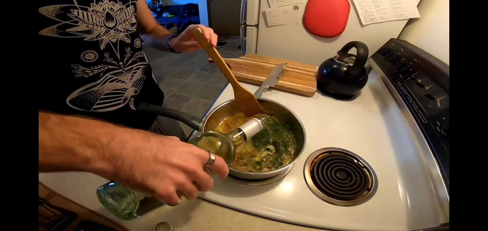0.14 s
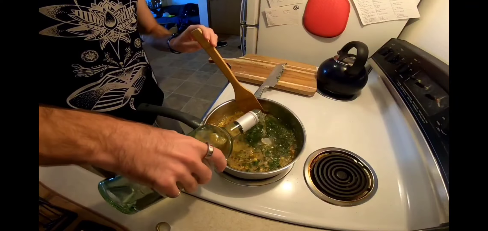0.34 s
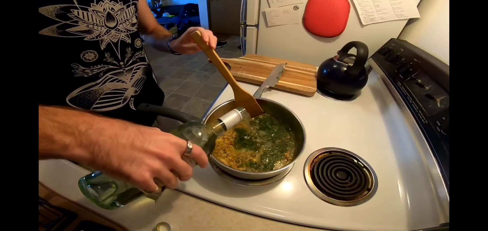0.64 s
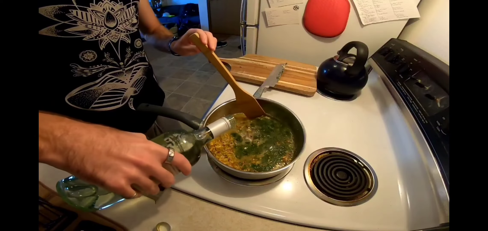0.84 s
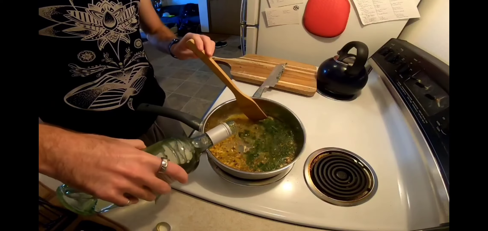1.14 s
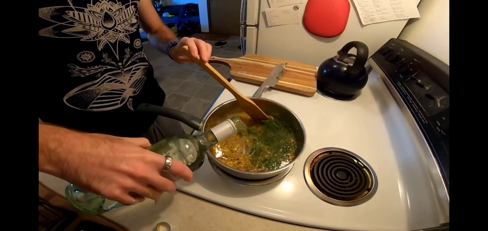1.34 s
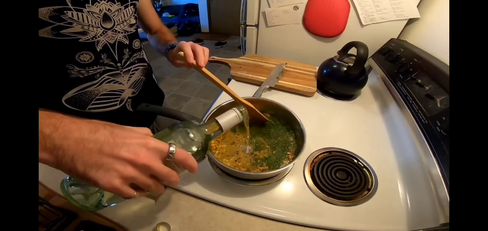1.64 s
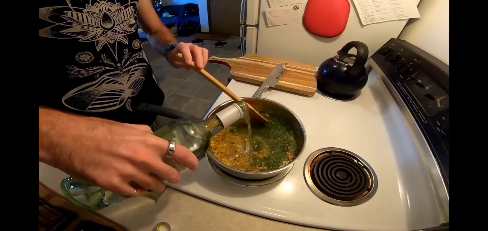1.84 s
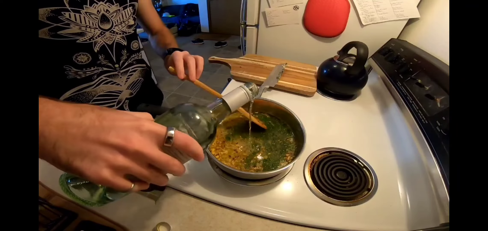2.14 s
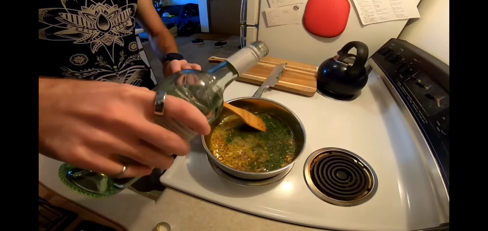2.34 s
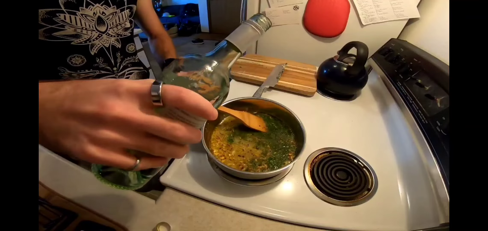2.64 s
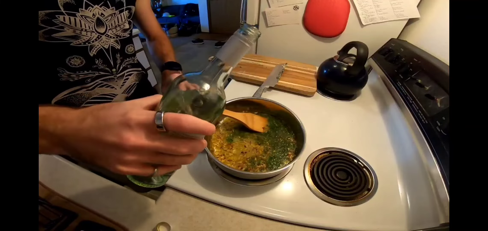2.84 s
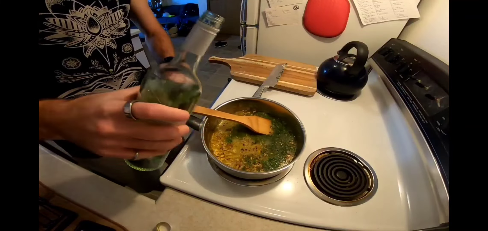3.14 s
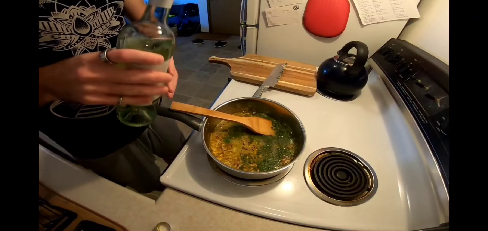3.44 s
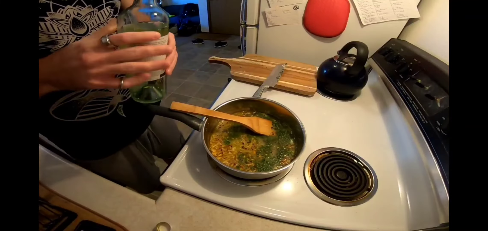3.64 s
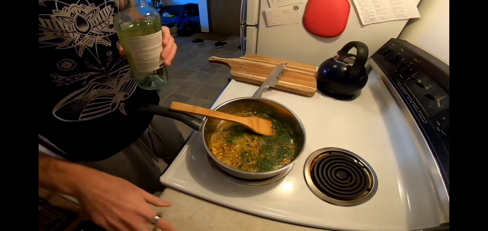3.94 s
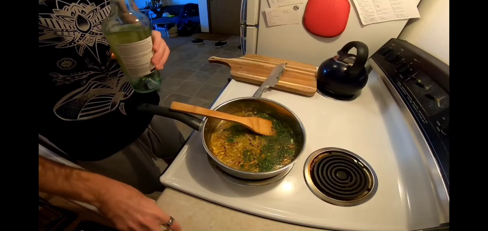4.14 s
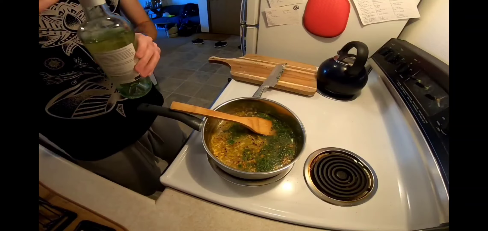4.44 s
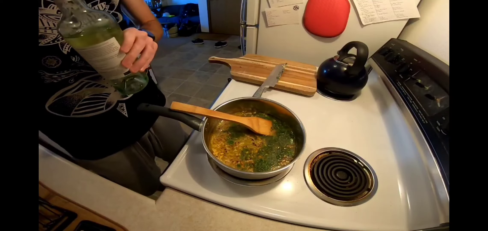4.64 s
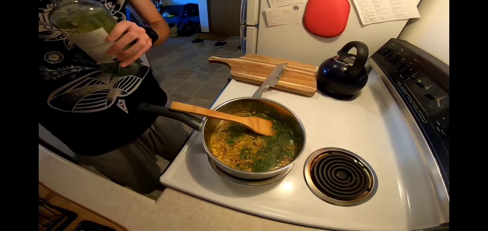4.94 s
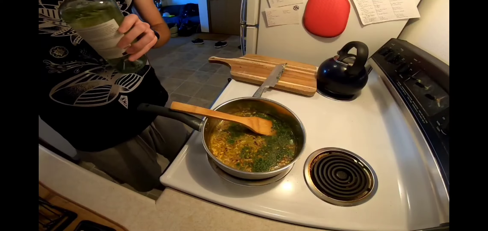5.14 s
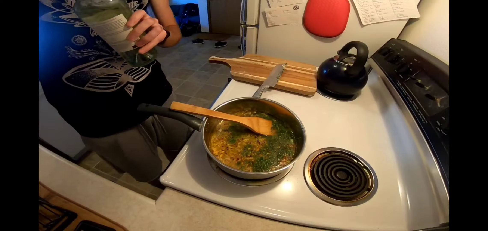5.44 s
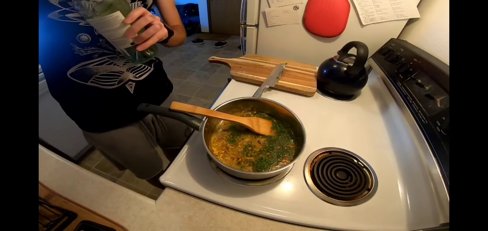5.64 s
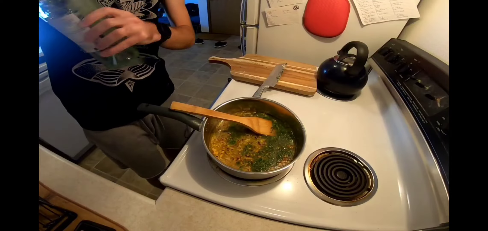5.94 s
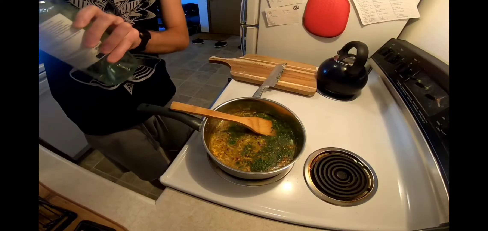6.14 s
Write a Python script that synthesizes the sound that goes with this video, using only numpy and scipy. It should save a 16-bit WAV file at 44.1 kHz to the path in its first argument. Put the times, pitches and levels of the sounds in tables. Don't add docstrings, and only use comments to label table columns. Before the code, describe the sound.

A close stereo pickup in a small kitchen with faint room air and a short echo. From 0 to 2.6 s wine pours into a wet stew: frothy gurgling, clear plops around 0.1-0.4, 0.75 and 1.03 s, crisp splats, and low bottle glugs, strongest near 0.7 and 1.0 s. The stream thins around 1.3 s, surges again near 2.2-2.3 s, then dribbles out. At 2.8 s a wooden spoon knocks the steel rim with a short hollow ring and tiny bounces, the pan rocking faintly. A sleeve rustles near 3 s; very quiet squeaks and rubs on glass follow at 3.6-3.8. A hand lands with a soft thump at 4.2 s. At 4.67 s a thin metal cap strikes the neck, the loudest, sharpest sound, then gritty scrapes, short singing strokes and damped clicks continue to about 5.8 s. Faint chinks close at 6.1-6.3 s.

```python
import sys
import numpy as np
from scipy import signal
from scipy.fft import rfft, irfft, next_fast_len
from scipy.io import wavfile
from scipy.ndimage import uniform_filter1d

SR = 44100
rng = np.random.default_rng(int(sys.argv[2]) if len(sys.argv) > 2 else 0)


def voltage_ratio(decibels):
    exponent = np.asarray(decibels, float) / 20
    return 10 ** exponent


def store_wav(level_fs):
    pcm = np.round(np.clip(np.atleast_2d(level_fs), -1, 1) * 32767)
    wavfile.write(sys.argv[1], SR, pcm.T.astype(np.int16))


N = 276948
POUR_END_S = 2.62

# (frequency [Hz], level [dB per Hz])
AIR_SPECTRUM = [(15, -38), (25, -11), (91, -18.5), (226, -2.5), (313, -13.5), (357, -8), (443, -13.5),
                (493, -7.5), (580, -13.5), (738, -11), (2280, -23.5), (8750, -32), (15400, -64.5)]
AIR_DB = -73
# (frequency [Hz], correlation [0 to 1])
STEREO_LIKENESS = [(60, 0.74), (500, 0.2), (2000, 0.23), (5000, 0.9), (12000, 0.11)]
# (time [s], level [dB])
RUMBLE = [
    (0, -81.5),
    (3.3, -86.5),
    (3.5, -72.5),
    (3.7, -82),
    (6.3, -85.5),
]
# (time [s], level [dB])
SLEEVE = [
    (2.85, -90),
    (3.0, -76.5),
    (3.2, -84),
    (3.35, -95),
]
# (frequency [Hz], level [dB per Hz])
CLOTH_SPECTRUM = [(1470, -44.5), (2500, -22), (4050, -16), (6340, 0), (11000, -38.5), (14300, -64),
                  (22000, -120)]
# (frequency [Hz], t60 [s])
KITCHEN_T60 = [(200, 0.26), (2000, 0.2), (10000, 0.13)]

# (time [s], peak level [dB])
HAND_BLOWS = [
    (4.194, -43),
    (4.214, -33.5),
    (4.222, -37),
]
# (frequency [Hz], level [dB per Hz])
COUNTER_SPECTRUM = [(88, -38), (150, -9), (318, -34), (477, -11), (1270, 0), (1770, -15.5), (2310, -6),
                    (2810, -26), (5720, -10.5), (10000, -25), (15000, -54)]

# (time [s], peak level [dB])
SPOON_BLOWS = [
    (2.785, -42),
    (2.791, -41.5),
    (2.85, -56),
    (2.949, -59),
]
# (frequency [Hz], level [dB], t60 [s])
RIM_MODES = [(523, -5, 0.21), (704, -6, 0.053), (870, -9, 0.36), (1132, -4, 0.19), (1325, -3.5, 0.18),
             (1550, -11.5, 0.092)]
# (time [s], level [dB], length
# [s], fade [dB per s])
DULL_SHUDDERS = [
    (2.79, -54, 0.34, 42),
    (4.669, -64, 0.29, 6),
]

# (time [s], peak level [dB], left-right balance [dB])
CAP_LANDING = (4.670, -14.5, 0.66)
# (frequency [Hz], level [dB], t60 [s])
CAP_MODES = [(1688, -16.5, 0.049), (2810, -22, 0.089), (3030, -3.5, 0.041), (3563, -1.5, 0.019),
             (3970, -15.5, 0.067), (4640, -19.5, 0.072), (5600, -43, 0.18), (5360, -22, 0.065),
             (7400, -29.5, .06), (7760, -32, 0.087)]
# (frequency [Hz], width [Hz], level [dB])
HELD_CAP_MODES = [(2050, 100, -0.5), (2500, 89, -0.5), (3600, 210, -3.5), (4350, 82, -4), (5220, 92, -1),
                  (7320, 290, 0.5)]
# (time [s], peak level [dB], frequency [Hz], brightness [dB])
CAP_CLICKS = [(3.905, -50, 2970, -22), (4.8605, -24, 1330, -11), (4.8872, -26.5, 2520, -5),
              (5.1699, -34, 2290, -20.5), (5.1861, -24, 4340, -11), (5.3326, -22, 3640, -4.5),
              (5.3653, -24.5, 2610, -6), (5.714, -29.5, 2346, -8.5), (5.72, -25, 2190, -9.5),
              (5.725, -31.5, 1210, -25), (5.78, -24, 1790, -8), (6.1727, -48, 4530, 7.5)]
CLICK_CYCLES = 187
# (frequency [Hz], level [dB per Hz])
THREAD_SPECTRUM = [(410, -42.5), (700, -16.5), (1160, -5.5), (1470, -6), (2470, 1), (2780, -3.5),
                   (3590, -8), (4500, -10.5), (5850, -22), (9900, -120)]
# (frequency [Hz], level [dB per Hz])
RASP_SPECTRUM = [(2000, -20.5), (3500, -6), (5400, -2), (7450, -5), (10200, -10), (11300, -24),
                 (13500, -19.5), (15000, -46), (16000, -88.5)]
# (peak time [s], level [dB], rise
# [s], fall [s], brightness [dB])
CAP_SCRAPES = [(3.637, -77.5, .02, .03, 9.5), (3.725, -72.5, 0.061, 0.057, 11),
               (3.772, -66, 0.045, 0.17, 0.5), (4.47, -71.5, 0.058, 0.16, 7),
               (4.68, -47, 0.027, 0.12, -13), (4.785, -42, 0.077, 0.026, -1), (4.895, -40, 0.1, 0.063, -9),
               (5.019, -39.5, 0.037, 0.061, 3), (5.079, -42.5, 0.048, 0.1, -8.5),
               (5.2, -59, 0.031, 0.02, 10), (5.336, -43, 0.0064, 0.19, -3), (5.455, -46, 0.066, .04, -13),
               (5.495, -38.5, 0.051, 0.033, -9), (5.745, -42.5, 0.042, 0.074, -1.5),
               (6.18, -65.5, 0.14, 0.17, 12)]
TURN_FADE_DB = 27
# (time [s], pressure level [dB])
FINGER_HOLD = [
    (4.66, -67),
    (5.32, -66.5),
    (5.6, -59),
    (5.85, -58.5),
    (6.05, -70.5),
    (6.28, -66.5),
]
# (centre time [s], rms level [dB], frequency [Hz], half length [s])
CAP_STROKES = [
    (4.726, -50, 3100, 0.037),
    (4.771, -47, 2500, 0.022),
    (4.776, -45, 1543, 0.012),
    (4.876, -44, 1277, 0.016),
    (4.745, -50, 1620, .03),
    (4.83, -58, 1450, .025),
    (4.9, -48, 3800, .006),
    (5.19, -50, 5250, .015),
    (5.024, -41.5, 2500, 0.015),
    (5.081, -50, 2520, 0.014),
]
STROKE_WIDTH_HZ = 280
# (centre time [s], rms level [dB], frequency [Hz], half length [s])
CAP_SQUEAKS = [
    (3.637, -75, 5050, 0.011),
    (3.637, -80, 6800, .01),
    (3.725, -80, 3510, .018),
    (3.725, -75, 4260, .018),
    (3.725, -74, 6450, .02),
    (3.72, -80, 9900, 0.014),
    (3.771, -70, 4250, .012),
    (3.772, -76, 3480, 0.011),
    (3.77, -77, 5300, .01),
    (3.772, -82, 7400, .01),
]
SQUEAK_WIDTH_HZ = 120
# (time [s], peak level [dB], frequency [Hz])
RING_CHINKS = [
    (6.131, -52.5, 4350),
    (6.209, -43, 4390),
    (6.264, -54, 3537),
]
# (time [s], peak level [dB], centre frequency [Hz])
GRIP_SHIFTS = [
    (4.862, -47.5, 270),
    (4.886, -49, 257),
    (5.182, -54, 460),
    (5.255, -48.5, 619),
    (5.288, -49.5, 358),
    (5.363, -46, 870),
    (5.519, -53, 586),
    (5.6, -56, 446),
    (5.717, -43.5, 751),
    (5.783, -58, 670),
]

# (centre time [s], peak level [dB], frequency [Hz])
AIR_GLUGS = [
    (.12, -43.5, 86.2),
    (.335, -60.5, 48.6),
    (.387, -56, 74.3),
    (.726, -37.5, 99.2),
    (.99, -42, 94),
    (1.039, -57, 88.5),
    (1.237, -50, 93),
    (1.531, -48, 81.1),
    (1.848, -49.5, 93),
]
GLUG_HALF_S, GLUG_SHORTENS, GLUG_RISE = .017, .35, .3
# (time [s], level [dB])
STREAM = [
    (0.0, -51.5),
    (0.98, -51.5),
    (1.3, -58.5),
    (1.98, -54),
    (2.16, -51),
    (2.32, -49),
    (2.38, -52),
    (2.5, -70.5),
    (2.62, -79),
]
# (frequency [Hz], level [dB per Hz])
GURGLE_SPECTRUM = [(380, -55), (650, -23), (884, -0.5), (1090, -10.5), (1320, -11), (1920, -4), (5000, -9),
                   (6500, -40), (11000, -120)]
# (frequency [Hz], level [dB per Hz])
SPRAY_SPECTRUM = [(1800, -35.5), (3000, 1), (4300, -10.5), (6200, -5.5), (7700, -4.5), (10300, -10.5),
                  (11300, -23.5), (14000, -35.5), (15400, -60)]
SPRAY_DB, SPRAY_GAINS_DB_PER_S = -11, 2.5
# (frequency [Hz], width [Hz], level [dB])
PAN_MODES = [(1920, 66, 7.5), (2440, 73, -6.5), (3820, 42, -2), (4690, 42, -7), (6330, 200, -4),
             (7420, 80, -3)]
# (time [s], peak level [dB], frequency [Hz], t60 [s], swell [s])
PLOPS = [(.01, -31.5, 3600, 0.021, .001), (.011, -29.5, 2960, 0.027, .001),
         (.1325, -26.5, 3600, .012, .0005), (.1325, -21, 1904, 0.017, .001), (.139, -27, 2136, 0.037, .003),
         (.19, -26, 3800, 0.026, .0006), (.396, -31.5, 1720, 0.015, .0005), (.399, -26.5, 2060, 0.01, .001),
         (.4015, -16.5, 2158, .017, .03), (.412, -26, 2170, .022, .02), (.425, -40, 2170, .4, .004),
         (.737, -19, 1730, 0.055, .001), (.737, -23, 2956, .04, .001), (.745, -23.5, 2196, .05, .002),
         (.765, -38, 1846, 0.14, .004), (1.024, -20.5, 1955, .012, .03), (1.032, -29.5, 1975, .03, .03),
         (1.05, -39, 2030, .04, .03), (2.183, -31, 2300, 0.029, .001)]
# (time [s], peak level [dB], frequency [Hz])
BUBBLES = [(0.081, -37, 1990), (0.522, -38, 3210), (.642, -36.5, 1900), (.634, -36.5, 3270),
           (.049, -42, 2810), (.1, -40, 2790), (.22, -43, 2300), (.259, -44, 4300), (.281, -43.5, 3900),
           (.312, -39, 3270), (.449, -43, 3310), (.565, -40.5, 3240), (.8, -38, 3400), (.909, -42.5, 2720),
           (.951, -39, 3000), (1.257, -44, 3190), (1.297, -45, 1700), (1.42, -43, 3460),
           (1.462, -42.5, 1940), (1.476, -40.5, 2850), (1.53, -47, 2690), (1.652, -39, 2900),
           (1.718, -40.5, 2800), (1.78, -41, 1800), (1.934, -40, 3820), (2.071, -38, 1930),
           (2.108, -39, 3390), (2.173, -31, 3380), (2.289, -41, 2640), (2.397, -39, 2900),
           (2.495, -44.5, 2650), (0.66, -37, 1550), (.807, -35, 2050), (.933, -33.5, 3060),
           (1.09, -37.5, 3100), (1.461, -41, 2820), (1.594, -34.5, 2036), (1.625, -35, 3600),
           (1.758, -39, 1790), (1.793, -38.5, 3260), (1.942, -32.5, 2020), (1.968, -34.5, 3660),
           (2.054, -37.5, 1900), (2.173, -34, 2440), (2.309, -34, 2175), (2.342, -34.5, 1770),
           (2.372, -36.5, 2010), (1.989, -39, 1870), (1.58, -37, 1880), (.735, -34, 3700),
           (2.372, -35.5, 3600), (2.437, -37.5, 2440), (2.516, -45.5, 2200)]
# (time [s], peak level [dB], frequency [Hz])
GULPS = [(.012, -42, 1200), (.058, -45.5, 1150), (.26, -47.5, 1250), (1.225, -45.5, 1200),
         (1.682, -50, 1600), (.951, -39, 1350), (1.055, -39, 1450), (0.14, -42.5, 1105), (.32, -40.5, 1040),
         (.36, -41.5, 704), (.535, -42.5, 1134), (0.711, -38.5, 1040), (0.751, -37.5, 577),
         (.845, -38.5, 1085), (.871, -38, 1370), (1.265, -38, 1300), (1.498, -41, 1384), (1.58, -39.5, 914),
         (1.911, -45, 1110), (2.223, -36.5, 866), (2.281, -35, 1320)]
BUBBLE_T60_S, GULP_T60_S = .045, .07
# (time [s], peak level [dB], centre frequency [Hz])
SPLATS = [(0.1677, -39, 7700), (0.323, -24, 5600), (.324, -30, 8000), (.393, -39.5, 3750),
          (.4868, -37.5, 9100), (0.601, -35, 6850), (0.635, -41, 5960), (.01, -35.5, 7100),
          (.079, -43.5, 7800), (.35, -42.5, 4500), (.378, -40, 4000), (.617, -42, 5000), (.922, -47, 6100),
          (.9966, -42, 4640), (1.115, -42, 7200), (1.331, -44, 5470), (1.43, -47.5, 5900),
          (1.9157, -41.5, 4960), (2.154, -41, 6330), (2.19, -36.5, 5500), (2.249, -37, 7600),
          (2.398, -40, 6500), (.743, -31, 4840), (.746, -37, 7000), (0.871, -36.5, 5300),
          (0.9556, -36, 4640), (1.0154, -42, 4470), (1.154, -36.5, 6730), (1.3606, -34.5, 5400),
          (1.463, -39, 4230), (1.543, -38.5, 4680), (1.5743, -30, 6200), (1.7558, -41, 6300),
          (1.8892, -42, 4850), (1.9883, -32.5, 3600), (2.0558, -39, 6600), (2.1325, -39, 6820),
          (2.175, -31, 5900), (2.2598, -32, 6700), (2.3079, -33.5, 3800), (2.341, -31.5, 6350),
          (2.371, -34.5, 6200), (2.458, -28, 8120), (2.515, -40.5, 4010)]

# (frequency [Hz], lead of the left [rad])
PORT_PHASE = [(90, 0.72), (200, 0.2), (600, 1.5), (1400, 1.28), (2600, 0.3), (5000, 0.98), (9000, 1.66),
              (14000, 1.8)]
# (frequency [Hz], level [dB])
TREBLE_BALANCE = [(9000, 3), (10700, 4), (11700, -6), (13000, -10.5), (14500, -6), (16000, -20.5)]
APART_S = .00004


def unit(x):
    return x / np.sqrt(np.mean(x ** 2) + 1e-20)


def along(points, hz):
    f, v = np.transpose(points)
    return np.interp(np.log(hz + 1), np.log(f + 1), v)


def gain(points):
    s, db = np.transpose(points)
    return voltage_ratio(np.interp(np.arange(N) / SR, s, db, left=-140, right=-140))


def seconds(length):
    return np.arange(round(length * SR)) / SR


def filtered(x, response):
    m = next_fast_len(x.shape[-1] + 2048)
    return irfft(rfft(x, m) * response(np.fft.rfftfreq(m, 1 / SR)), m)[..., :x.shape[-1]]


def peak(hz, width_hz):
    return lambda f: 1j * f * width_hz / (hz * hz - f * f + 1j * f * width_hz)


def steep(hz, width_hz):
    return lambda f: peak(hz, width_hz)(f) ** 2


def coloured(spectrum):
    return lambda hz: voltage_ratio(along(spectrum, hz))


def tinted(spectrum, modes):
    return lambda f: coloured(spectrum)(f) * np.abs(1 + sum(voltage_ratio(db) * peak(hz, w)(f) for hz, w, db in modes))


def rush(response, patchy_db):
    z = signal.stft(rng.standard_normal((2, N + 512)), nperseg=256)[2]
    field = uniform_filter1d(rng.standard_normal(z.shape[1:]), size=5, axis=0)
    field = uniform_filter1d(field, size=6, axis=1)
    pair = signal.istft(z * voltage_ratio(patchy_db * unit(field)), nperseg=256)[1][:, :N]

    def mid_side(hz):
        turn = np.arccos(np.clip(along(STEREO_LIKENESS, hz), -1, 1)) / 2
        return response(hz) * [np.cos(turn), np.sin(turn)]

    mid, side = filtered(pair, mid_side)
    return unit(np.array([mid + side, mid - side]))


def ring(t, hz, t60, rise, attack):
    phase = 2 * np.pi * hz * (t + rise * t * t / (2 * t60))
    return np.sin(phase) * voltage_ratio(-60 * t / t60) * (1 - np.exp(-t / attack))


def burst(t, t60, response):
    fade = voltage_ratio(-60 * t / t60)
    puff = filtered(rng.standard_normal(len(t)), response) * fade
    return .5 * puff * np.linalg.norm(fade) / np.linalg.norm(puff)


def add(out, s, sound, pan_db=0):
    lag = rng.normal(0, APART_S)
    for side, way in zip(out, (.5, -.5)):
        part = side[round((s + way * lag) * SR):][:len(sound)]
        part += sound[:len(part)] * voltage_ratio(way * pan_db)


def background():
    shake = filtered(rng.standard_normal((2, N)), steep(42, 40))
    air = voltage_ratio(AIR_DB + 1.0) * rush(lambda f: coloured(AIR_SPECTRUM)(f) * (f > 60), patchy_db=0.5)
    cloth = gain(SLEEVE) * rush(coloured(CLOTH_SPECTRUM), patchy_db=2)
    return air + gain(RUMBLE) * 1.4 * unit(shake) + cloth


def kitchen(x):
    out, step = np.zeros((2, N + SR)), SR // 4
    for start in range(0, N, step):
        hz, t, z = signal.stft(rng.standard_normal((2, SR // 3)), SR, nperseg=256)
        decay = voltage_ratio(-60 * t / along(KITCHEN_T60, hz)[:, None])
        tail = signal.istft(z * decay, SR, nperseg=256)[1]
        wet = signal.fftconvolve(x[:, start:start + step], tail / np.linalg.norm(tail[0]), axes=1)
        out[:, start + 150:][:, :wet.shape[1]] += wet
    return out[:, :N]


def hand():
    out, t = np.zeros((2, N)), seconds(0.51)
    for s, db in HAND_BLOWS:
        blow = burst(t, 0.073, coloured(COUNTER_SPECTRUM)) * (1 - np.exp(-t / 0.0037))
        add(out, s - .003, voltage_ratio(db + 5.0) * blow, pan_db=-2.5)
    add(out, 4.215, voltage_ratio(-37.5) * ring(t, 45.9, 0.22, rise=0, attack=.02), pan_db=2.5)
    add(out, 4.2, voltage_ratio(-49.5) * burst(t, 0.31, steep(110, 90)))
    add(out, 5.255, voltage_ratio(-55) * burst(t, 0.2, steep(150, 140)))
    return out


def spoon():
    out, t = np.zeros((2, N)), seconds(0.44)
    for s, db in SPOON_BLOWS:
        rim = sum(voltage_ratio(level) * burst(t, life, steep(hz, .13 * hz)) for hz, level, life in RIM_MODES)
        thud = 0.49 * burst(t, 0.24, lambda f: steep(1300, 600)(f) + 1.3 * steep(650, 450)(f))
        tick = 0.26 * burst(t, 0.11, lambda f: peak(2800, 4500)(f) ** 3)
        knock = (1.34 * rim / np.max(np.abs(rim)) + thud + tick) * (1 - np.exp(-t / 0.0012))
        add(out, s - .003, voltage_ratio(db) * knock, pan_db=-2.0)
    add(out, 2.783, voltage_ratio(-33.5) * ring(t, 1315, 0.12, rise=0, attack=.008))
    add(out, 2.80, voltage_ratio(-45) * ring(t, 78, 0.12, rise=0, attack=0.0075))
    rocking = sum(gain([(s, db), (s + length, db - fade * length)]) for s, db, length, fade in DULL_SHUDDERS)
    return out + rocking * rush(steep(215, 95), patchy_db=3)


def rasp(f):
    return tinted(RASP_SPECTRUM, HELD_CAP_MODES)(f) * np.minimum(f / 2000, 1) ** 2


def cap_lands(out, t):
    s, db, pan_db = CAP_LANDING
    shell = sum(voltage_ratio(level) * ring(t, hz, life, rise=0, attack=0.00066) for hz, level, life in CAP_MODES)
    shell = shell + 0.72 * np.roll(shell, round(.0046 * SR))
    shell = shell * voltage_ratio(-300 * t)
    rattle = 0.18 * burst(t, 0.049, peak(3390, 1100))
    rattle += 0.17 * burst(t, 0.079, lambda f: rasp(f) / (1 + (f / 9500) ** 12))
    add(out, s, voltage_ratio(db) * (1.28 * shell / np.max(np.abs(shell)) + rattle), pan_db)
    add(out, s - .011, voltage_ratio(db - 29) * burst(t, 0.056, peak(3300, 1200)))


def cap_knocks(out, t):
    for s, db, hz, bright_db in CAP_CLICKS:
        t60 = CLICK_CYCLES / hz
        body = 0.27 * burst(t, t60, steep(hz, .2 * hz)) + 0.35 * burst(t, t60, coloured(THREAD_SPECTRUM))
        body += .8 * (db > -40) * burst(t, .004, steep(4000, 5000))
        add(out, s, voltage_ratio(db) * (body + voltage_ratio(bright_db) * burst(t, t60, rasp)), pan_db=2.5)
    for s, db, hz in RING_CHINKS:
        add(out, s, voltage_ratio(db) * ring(t, hz, 0.079, rise=0, attack=0.00091), pan_db=3)


def cap_sings(out, t):
    tones = [(*row, STROKE_WIDTH_HZ) for row in CAP_STROKES]
    tones += [(*row, SQUEAK_WIDTH_HZ) for row in CAP_SQUEAKS]
    for s, db, hz, half, width_hz in tones:
        tone = unit(filtered(rng.standard_normal(len(t)), steep(hz, width_hz)))
        swell = np.exp(-((t - .15) / half) ** 2 / 2)
        add(out, s - .15, voltage_ratio(db) * tone * swell, pan_db=1.5)


def cap_scraping():
    now, rest = np.arange(N) / SR, gain(FINGER_HOLD)
    low, high = rest, rest * voltage_ratio(-0.5)
    for s, db, rise, fall, bright_db in CAP_SCRAPES:
        stroke = voltage_ratio(db - TURN_FADE_DB * np.maximum((s - now) / rise, (now - s) / fall))
        low, high = low + stroke, high + voltage_ratio(bright_db) * stroke
    return low, high


def cap():
    out, t = np.zeros((2, N)), seconds(0.27)
    cap_lands(out, t)
    cap_knocks(out, t)
    cap_sings(out, t)
    low, high = cap_scraping()
    dull = low * rush(tinted(THREAD_SPECTRUM, HELD_CAP_MODES), patchy_db=1.5)
    out += voltage_ratio(-4.5) * (dull + high * rush(rasp, patchy_db=3.0))
    out += voltage_ratio(-11) * gain(FINGER_HOLD) * rush(steep(520, 600), patchy_db=4)
    for s, db, hz in GRIP_SHIFTS:
        add(out, s, voltage_ratio(db) * burst(t, 0.17, steep(hz, 1.3 * hz)) * (1 - np.exp(-t / 0.0023)))
    return out


def glugs():
    out, t = np.zeros((2, N)), seconds(.2) - .1
    for s, db, hz in AIR_GLUGS:
        half = GLUG_HALF_S * np.exp(-GLUG_SHORTENS * s)
        phase = 2 * np.pi * hz * (t + GLUG_RISE * t * t / (4 * half))
        add(out, s - .1, voltage_ratio(db) * np.exp(-(t / half) ** 2 / 2) * np.cos(phase), pan_db=-.7)
    return out


def grains(count, centre_hz, spread, cycles, scatter_db):
    when, pitch, size, place = rng.random((count, 4)).T
    hz = centre_hz * np.exp(spread * 4 * (pitch - .5))[:, None]
    t = seconds(.02)[None]
    strength = voltage_ratio(-scatter_db * np.log(size + .07))
    rows = strength[:, None] * ring(t, hz, cycles / hz, rise=0.044, attack=0.0001)
    at = (when * POUR_END_S * SR).astype(int)[:, None] + np.arange(t.size)
    sides = []
    for way in (1, -1):
        placed = rows * voltage_ratio(way * 3.64 * (place[:, None] - 1.0))
        sides.append(np.bincount(at.ravel(), placed.ravel(), N))
    x = np.array(sides)
    return x / np.sqrt(np.mean(x[:, :round(POUR_END_S * SR)] ** 2))


def stream():
    gurgle = gain(STREAM)
    spray = gurgle * voltage_ratio(SPRAY_DB + SPRAY_GAINS_DB_PER_S * seconds(N / SR))
    low = grains(count=1500, centre_hz=2300, spread=0.323, cycles=72, scatter_db=8.0)
    high = grains(count=2500, centre_hz=6200, spread=.22, cycles=80, scatter_db=3.5)
    out = gurgle * (0.51 * low + 0.46 * rush(tinted(GURGLE_SPECTRUM, PAN_MODES), patchy_db=7.5))
    return out + spray * (0.5 * high + 1.21 * rush(tinted(SPRAY_SPECTRUM, PAN_MODES), patchy_db=8.5))


def bubbles(out, t):
    all_bubbles = PLOPS + [(*row, BUBBLE_T60_S, .0005) for row in BUBBLES]
    all_bubbles += [(*row, GULP_T60_S, .001) for row in GULPS]
    for s, db, hz, t60, swell in all_bubbles:
        rough = np.clip((-19 - db) / 20, .05, .75) * np.exp(-(swell / .004) ** 2)
        beat = 1 - .25 * np.sin(np.pi * rng.uniform(60, 100) * t) ** 2
        clean = beat * (1 - np.exp(-t / swell)) * ring(t, hz, t60, rise=0.028, attack=swell)
        clean /= np.max(np.abs(clean))
        froth = burst(t, 1.34 * t60, steep(1.03 * hz, .16 * hz)) + 0.69 * burst(t, 0.025, steep(1.5 * hz, 3000))
        plop = voltage_ratio(-35.0) * burst(t, 0.043, steep(260, 300))
        sound = (1 - rough) * clean + rough * froth + plop
        add(out, s - .001, voltage_ratio(db - 1.0) * sound, pan_db=rng.normal(-1.6, 1.1))


def splats(out, t):
    for s, db, hz in SPLATS:
        near = peak(hz, 0.28 * hz)
        splat = burst(t, 0.051, lambda f: near(f) * (near(f) + 0.5))
        splat += 0.19 * ring(t, hz, .03, rise=0.024, attack=0.00046)
        splat += .4 * burst(t, .005, near)
        add(out, s, voltage_ratio(db - 1.5) * splat, pan_db=rng.normal(0, 1.0))


def pour():
    out, t = stream(), seconds(.18)
    bubbles(out, t)
    splats(out, t)
    return out


def scene():
    near = hand() + spoon() + cap() + pour()
    return background() + voltage_ratio(-9.5) * kitchen(near) + glugs() + near


def roll_off(x):
    return signal.sosfilt(signal.butter(12, 15530, fs=SR, output="sos"), x)


def record(dry):
    def ports(hz):
        lead = along(PORT_PHASE, hz) * np.array([[1], [-1]])
        return voltage_ratio(along(TREBLE_BALANCE, hz)) * np.exp(.5j * lead)

    return roll_off(filtered(dry, ports))


dry = scene()
out = record(dry)
store_wav(out)
```